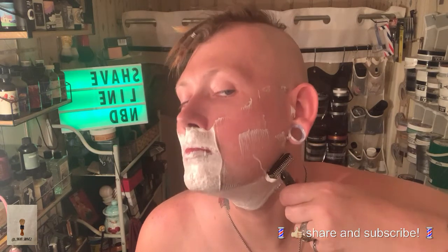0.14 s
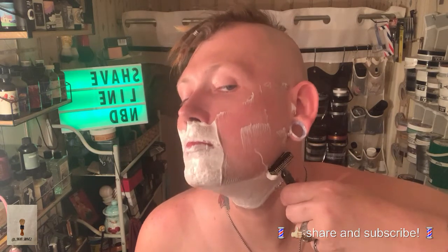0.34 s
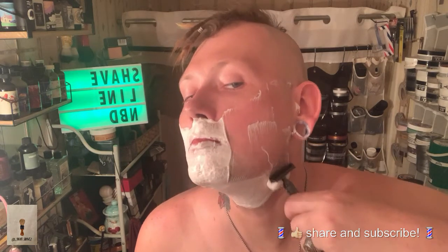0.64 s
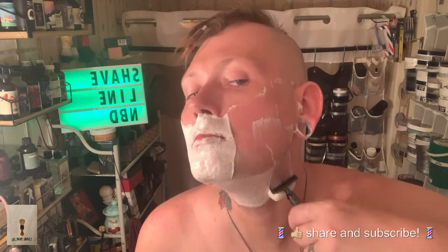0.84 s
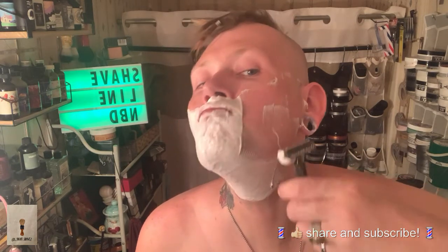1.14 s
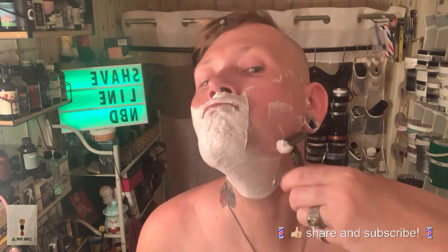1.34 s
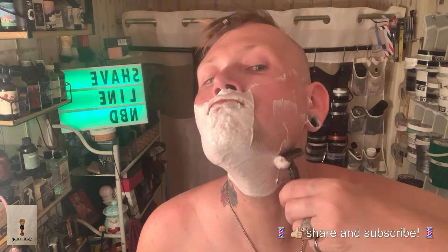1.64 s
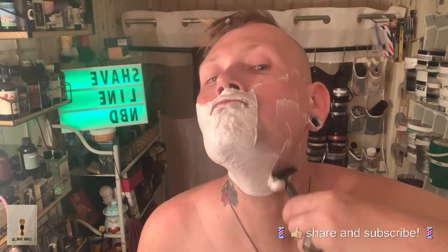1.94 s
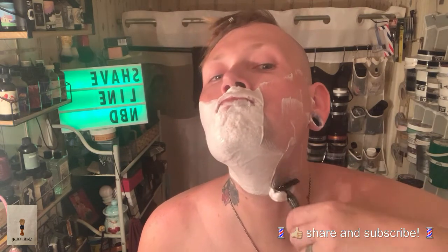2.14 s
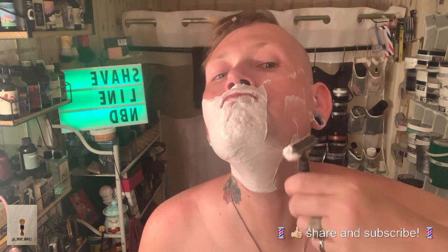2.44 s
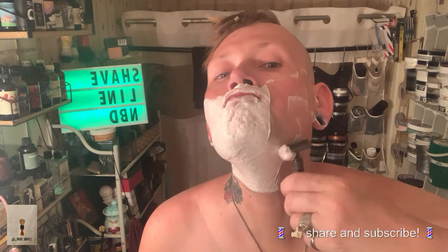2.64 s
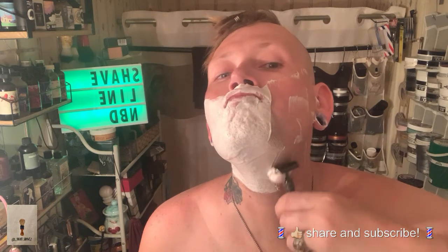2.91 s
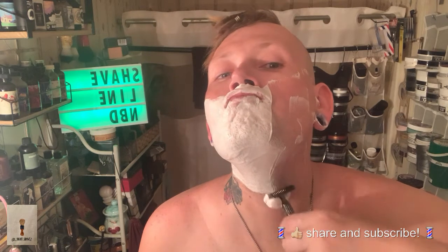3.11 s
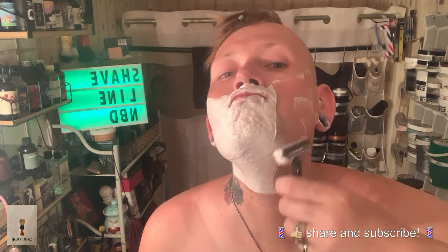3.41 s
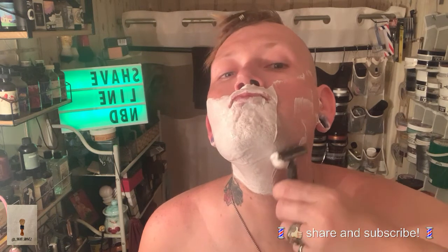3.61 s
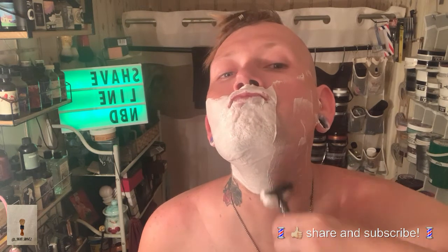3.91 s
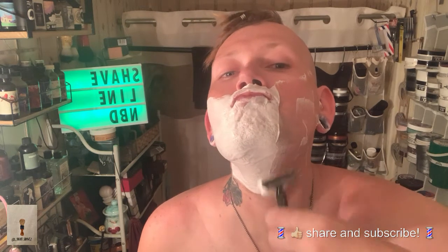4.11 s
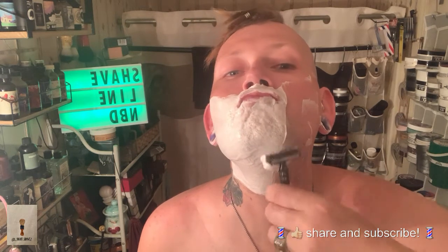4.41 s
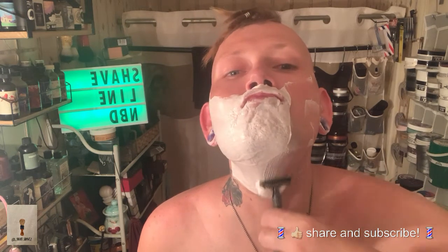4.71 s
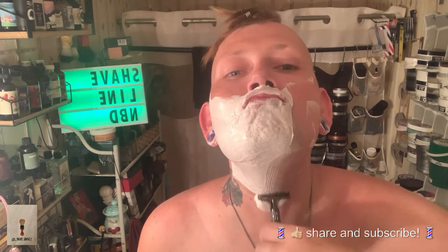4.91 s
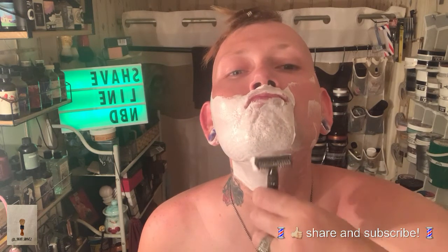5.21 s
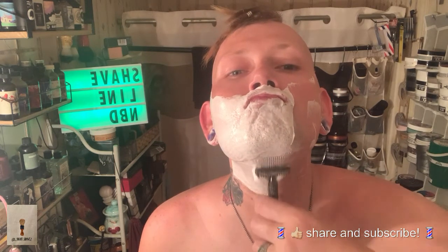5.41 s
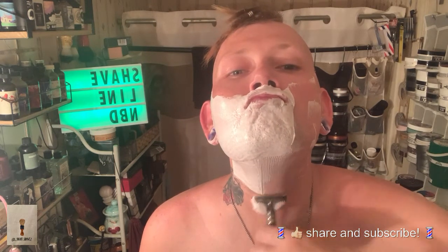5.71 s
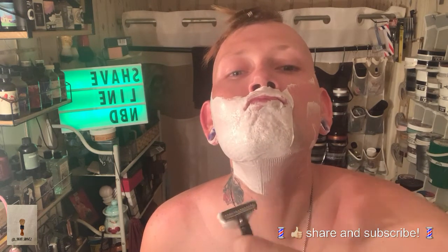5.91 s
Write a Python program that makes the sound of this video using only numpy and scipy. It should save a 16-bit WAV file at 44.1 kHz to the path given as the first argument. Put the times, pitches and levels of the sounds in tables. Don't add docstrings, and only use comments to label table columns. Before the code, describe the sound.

Short gritty razor strokes crackle and rasp on lathered skin, with one small hard knock, above a constant deep electrical hum.

```python
import sys
import numpy as np
from scipy import signal
from scipy.fft import rfft, irfft, next_fast_len
from scipy.io import wavfile
from scipy.ndimage import uniform_filter1d

SR = 44100
rng = np.random.default_rng(int(sys.argv[2]) if len(sys.argv) > 2 else 0)


def persist_wave(psi):
    counts = np.round(np.clip(psi, -1, 1) * 32767).astype(np.int16)
    wavfile.write(sys.argv[1], SR, np.atleast_2d(counts).T)


def invert_db(x):
    u = np.asarray(x, float) / 20
    return 10 ** u


N = 266951

# mode_hz, width_hz, rms_db
ROOM_MODES = [(25.3, 20, -71), (37.5, 4.8, -59.5), (49.8, 6.4, -51.5), (61, 10, -59), (68.4, 16.5, -58),
              (99.5, 12, -57.5), (136, 21.6, -54.5), (167, 18, -80.5), (184.4, 9.5, -66.5),
              (222.2, 11.2, -70), (236.7, 20, -67), (259, 4.4, -68), (280.4, 12, -69.5), (304.3, 14.3, -66),
              (322.1, 7.9, -82), (385.5, 26, -71), (483.4, 39, -75.5), (549, 41, -78.5), (692, 18, -82.5),
              (903, 34, -80.5)]
# frequency_hz, density_db (per Hz)
FAN_AIR = [(190, -34.5), (330, -4.5), (391, -3.5), (428, -12), (491, -3.5), (637, -13), (678, -13.5),
           (852, -10), (963, -15), (1500, -18.5), (1570, -22), (1700, -20.5), (4450, -30), (12800, -36.5),
           (16600, -61), (22000, -120)]
# start_s, blow_db, rattle_db, dullness_0_to_1
KNOCKS = [
    (1.059, -32.5, -49.5, 0.06),
    (1.1212, -56, -57, 0.62),
]
# mode_hz, width_hz, level_db
OBJECT_MODES = [(423, 57, -7), (755, 330, 13), (2130, 230, 5), (3100, 1450, 9), (4460, 810, -6),
                (7850, 900, 0), (10970, 380, 9)]
# mode_hz, width_hz, level_db (over the part's broad band)
HANDLE_MODES = [(2009, 54, 13.5), (2256, 45, 7.5)]
GUARD_MODES = [(2975, 58, 1.4), (3800, 53, 1.1), (4540, 21, -5)]
BLADE_MODES = [(5190, 67, 3.8), (5640, 69, 4), (6100, 250, 1.5), (6500, 200, 5.1), (6970, 200, 4)]
SNAP_MODES = [(7860, 320, -2), (8900, 130, 0.5), (9600, 200, 0), (10570, 470, -8)]
# start_s, jump_db
CATCHES = [(.11, 5), (.154, 9), (.258, 7), (.392, 10), (.46, 15), (.502, 5), (.695, 5), (1.395, 2),
           (1.468, 1), (1.605, 2), (1.66, 9), (1.76, 6), (2.173, 12.5), (4.455, 9.5), (4.68, -1),
           (4.757, 7), (4.795, 7.5), (4.845, 5), (5.354, 19.5), (5.522, 5.5), (5.885, 5)]
# start_s, pitch_hz, level_db, t60_s
SINGING = [
    (.505, 6500, -70, .3),
    (.58, 6500, -74, 0.22),
    (0.914, 6100, -64.5, .08),
    (5.36, 6100, -72, .06),
]
# start_s, length_s, pressure_db, cutting_db, steepness_db
GLIDES = [
    (-.05, 0.49, -81.5, -80.5, -4.5),
    (0.456, 0.42, -77.5, -79.5, -1.5),
    (1.367, 0.51, -76, -79, -1.5),
    (2.663, 0.1, -73, -68.5, -21),
    (3.589, 0.33, -73, -64, -3),
    (3.977, 0.44, -75.5, -74, -2),
    (4.44, 0.428, -73.5, -64, -7),
    (5.349, 0.36, -73, -70, -6.5),
]
# lift_s, build_s, pressure_db, cutting_db, steepness_db
SWEEPS = [(2.01, 0.28, -70, -66, 2.5), (2.09, 0.24, -63, -61, 2.2), (2.97, 0.29, -67, -67, 3),
          (3.125, 0.22, -64.5, -54.5, -0.5), (3.95, .12, -70, -55, -2.5), (4.3, 0.16, -71, -77.5, 3),
          (.8, 0.092, -80, -72, -6), (4.55, 0.15, -67.5, -60, -11), (4.85, 0.17, -72, -55, -7.5),
          (5.714, 0.32, -73, -58, -10.5), (6.07, 0.11, -72, -80, 5)]
# lift_s, cutting_db, steepness_db
DABS = [(.062, -72, -14), (.112, -78, -8), (.158, -78, -13), (.262, -83, -13), (.31, -73, -10),
        (.51, -76, -3), (.705, -74, -7), (.835, -80, 2), (0.911, -62.5, -5.5), (1.478, -70, -6),
        (1.61, -74.5, -2), (2.15, -67.5, -3), (2.184, -66.5, -3.5), (5.412, -63, -21), (5.595, -58, -21),
        (5.893, -77, -5)]
# start_s, level_db
BUMPS = [
    (1.39, -84),
    (2.8, -63.5),
    (3.592, -61.5),
    (4.1, -80),
    (4.505, -68.5),
    (5.365, -72),
]
# start_s, peak_db
HICCUPS = [
    (0.674, -41.5),
    (3.2981, -43),
    (4.622, -46),
    (5.945, -44),
]

HUM_HZ, HUM_DB, AIR_DB = 119.975, -41.5, -64
TICK_START_S, TICK_EVERY_S = 0.3725, 0.9735
TICK_DB, TICK_HZ, TICK_WIDTH_HZ = -68, 3600, 95
ROOM_T60_S, ROOM_DB = 0.15, -6
HAIRS_PER_S, HAIR_SPREAD_DB, CLUMP_DB = 2800, -0.5, 1.08
CATCH_FADE_S, BUMP_FADE_DB_PER_S = 0.009, 48
LAND_S, LIFT_DB_PER_S, BUILD_DB, BUILD_CURVE = 0.024, 380, 21.5, 1.64
PRESSURE_LEADS, BLADE_LEADS = 0.14, 0.022
DAB_BUILD_S, DAB_PRESSURE_DB = 0.023, -11.5
GUARD_DB, GUARD_FOLLOWS_PRESSURE = -4, 0.57
PORT_DIP_HZ, PORT_DIP_WIDTH_HZ, PORT_DIP_DEPTH = 14000, 2000, 0.62
WEAK_FROM_HZ, WEAK_DB, MASK_DB, PATCHY_DB = 12600, -121, -9, 3
WHINE_HZ, WHINE_DB = 14524, -87


def rms_one(x):
    return x / np.sqrt(np.mean(x ** 2) + 1e-20)


def drift(rate_hz):
    r = np.exp(-2 * np.pi * rate_hz / SR)
    noise = rng.standard_normal(N + SR)
    return rms_one(signal.lfilter([1], [1, -2 * r, r * r], noise)[SR:])


def resonance(x, hz, width_hz):
    r = np.exp(-np.pi * width_hz / SR)
    zeros = np.array([1, 0, -1]) * (1 - r * r) / 2
    poles = [1, -2 * r * np.cos(2 * np.pi * hz / SR), r * r]
    return signal.lfilter(zeros, poles, x)


def ring_modes(x, modes):
    return sum(invert_db(db) * resonance(x, hz, width_hz) for hz, width_hz, db in modes)


def burst(start_s, t60_s):
    age = np.arange(N) / SR - start_s
    return (age >= 0) * invert_db(-60 * np.clip(age, 0, 1) / t60_s)


def appliance():
    t = np.arange(N) / SR
    hum = np.sqrt(2) * invert_db(HUM_DB + 0.9 * drift(2.5)) * np.sin(2 * np.pi * HUM_HZ * t)
    rumble = np.zeros(N)
    for hz, width_hz, db in ROOM_MODES:
        noise = rng.standard_normal(N + SR)
        mode = resonance(resonance(noise, hz, width_hz), hz, width_hz * 1.62)
        rumble += invert_db(db) * rms_one(mode[SR:])
    size = next_fast_len(N)
    hz = np.arange(1, size // 2 + 2) * SR / size
    at_hz, density_db = np.transpose(FAN_AIR[:-1])
    shape_db = np.interp(np.log(hz), np.log(at_hz), density_db, left=-90)
    air = irfft(rfft(rng.standard_normal(size)) * invert_db(shape_db), size)[:N]
    return hum + rumble + invert_db(AIR_DB) * rms_one(air)


def clock():
    clicks = np.zeros(N)
    times_s = np.arange(TICK_START_S, N / SR, TICK_EVERY_S)
    clicks[(times_s * SR).astype(int)] = SR / (np.pi * TICK_WIDTH_HZ)
    low = resonance(clicks, TICK_HZ, TICK_WIDTH_HZ)
    high = resonance(clicks, 1.09 * TICK_HZ, TICK_WIDTH_HZ)
    return invert_db(TICK_DB) * (low + 0.47 * high)


def knocks():
    blows, grit = np.zeros(N), rng.standard_normal(N)
    for start_s, blow_db, rattle_db, dull in KNOCKS:
        force = invert_db(rattle_db) * grit * burst(start_s, 0.031)
        force[round(start_s * SR)] = -invert_db(blow_db)
        blows += signal.lfilter([1 - dull], [1, -dull], force)
    bright = signal.sosfilt(signal.butter(2, 2200, "high", fs=SR, output="sos"), blows)
    return bright + ring_modes(blows, OBJECT_MODES)


def room(x):
    age = np.arange(SR // 2) / SR
    tail = rng.standard_normal(len(age)) * invert_db(-60 * age / ROOM_T60_S) * (age > 0.004)
    return signal.fftconvolve(x, tail / np.sqrt(np.sum(tail ** 2)))[:N]


def singing():
    grit = rng.standard_normal(N)
    rings = np.zeros(N)
    for start_s, hz, db, t60_s in SINGING:
        rings += invert_db(db) * burst(start_s, t60_s) * rms_one(resonance(grit, hz, 150))
    return rings


def glide(t, start_s, length_s):
    landing = -30 * np.clip(1 - (t - start_s) / LAND_S, 0, 5)
    return landing - LIFT_DB_PER_S * np.clip(t - start_s - length_s, 0, 1)


def sweep(t, lift_s, build_s):
    build_up = -BUILD_DB * np.clip((lift_s - t) / build_s, 0, 3) ** BUILD_CURVE
    return build_up - LIFT_DB_PER_S * np.clip(t - lift_s, 0, 1)


def drive(pressure_db, blade_db, snap_db):
    share = GUARD_FOLLOWS_PRESSURE
    guard_db = GUARD_DB + share * pressure_db + (1 - share) * blade_db
    return invert_db([pressure_db, guard_db, blade_db, snap_db]) ** 2


def hand():
    t = np.arange(0, N + 32, 32) / SR
    power = np.zeros((4, len(t)))
    for start_s, length_s, pressure_db, cut_db, steep_db in GLIDES:
        shape = glide(t, start_s, length_s)
        power += drive(pressure_db + shape, cut_db + steep_db + shape, cut_db + shape)
    for start_s, db in BUMPS:
        fade = BUMP_FADE_DB_PER_S * np.clip(t - start_s, 0, 2)
        power[0] += invert_db(db + glide(t, start_s, 2) - fade) ** 2
    dabs = [(s, DAB_BUILD_S, db + DAB_PRESSURE_DB, db, steep_db) for s, db, steep_db in DABS]
    for lift_s, build_s, pressure_db, cut_db, steep_db in list(SWEEPS) + dabs:
        pressure = pressure_db + sweep(t, lift_s - PRESSURE_LEADS * build_s, build_s)
        blade = cut_db + steep_db + sweep(t, lift_s - BLADE_LEADS * build_s, build_s)
        power += drive(pressure, blade, cut_db + sweep(t, lift_s, build_s))
    return np.array([np.interp(np.arange(N) / SR, t, gain) for gain in np.sqrt(power)])


def catches():
    jumps = np.zeros(N)
    for start_s, jump_db in CATCHES:
        jumps[round(start_s * SR)] = jump_db
    return invert_db(signal.lfilter([1], [1, -np.exp(-1 / (CATCH_FADE_S * SR))], jumps))


def hairs():
    sizes = invert_db(HAIR_SPREAD_DB * np.minimum(rng.exponential(1, N), 5))
    cut = rng.random(N) < HAIRS_PER_S / SR
    clumps = invert_db(CLUMP_DB * (drift(34) + 0.38 * drift(110)))
    return sizes * cut * clumps * rng.choice([-1, 1], (4, N))


def body(x, modes, low_hz, high_hz):
    band = signal.butter(2, [low_hz, high_hz], "band", fs=SR, output="sos")
    return rms_one(signal.sosfilt(band, x + ring_modes(x, modes)))


def razor():
    guard, handle, blade, snap = hairs()
    parts = [body(handle, HANDLE_MODES, 1670, 3280),
             body(guard, GUARD_MODES, 2730, 4620),
             body(blade, BLADE_MODES, 4140, 7070),
             body(snap, SNAP_MODES, 6650, 13400)]
    return catches() * np.sum(hand() * parts, axis=0)


def scene():
    near = razor() + singing() + knocks() + clock()
    return (near + invert_db(ROOM_DB) * room(near) + appliance())[None]


def hiccups():
    spikes = np.zeros(N)
    for start_s, db in HICCUPS:
        spikes[min(round(start_s * SR), N - 1)] = invert_db(db + 2)
    return signal.lfilter([0.4, 1, 0.4], [1, -0.3], spikes)


def electronic_whine():
    phase = 2 * np.pi * WHINE_HZ * np.arange(N) / SR + 0.4 * drift(5.8)
    return np.sqrt(2) * invert_db(WHINE_DB + 1.2 * drift(12)) * np.sin(phase)


def drop_weak_treble(x):
    hz, _, cells = signal.stft(x, SR, "cosine", nperseg=2048, noverlap=1024)
    power = uniform_filter1d(abs(cells) ** 2, size=6, axis=1)
    below = (hz > 8000) & (hz < WEAK_FROM_HZ)
    masker = power[:, below].mean(axis=1, keepdims=True)
    whim = rng.standard_normal((len(hz) // 8 + 1, cells.shape[2]))
    whim = np.repeat(whim, 8, axis=0)[:len(hz)]
    threshold = (invert_db(2 * WEAK_DB) + invert_db(2 * MASK_DB) * masker) * invert_db(2 * PATCHY_DB * whim)
    weak = (power < threshold) & (hz[:, None] > WEAK_FROM_HZ)
    kept = np.where(weak, invert_db(-27), 1)
    return signal.istft(cells * kept, SR, "cosine", nperseg=2048, noverlap=1024)[1][:, :N]


def band_limit(x):
    return signal.sosfilt(signal.butter(12, 15690, fs=SR, output="sos"), x)


def record(dry):
    heard = dry - PORT_DIP_DEPTH * resonance(dry, PORT_DIP_HZ, PORT_DIP_WIDTH_HZ)
    mix = drop_weak_treble(heard + hiccups()) + electronic_whine()
    return band_limit(mix)


dry = scene()
out = record(dry)
persist_wave(out)
```